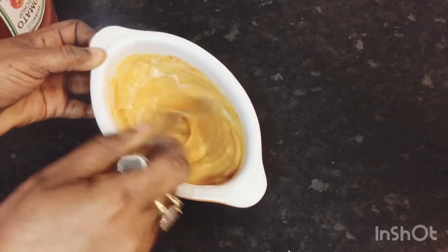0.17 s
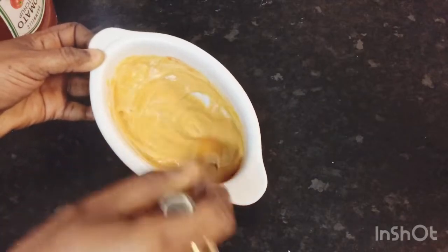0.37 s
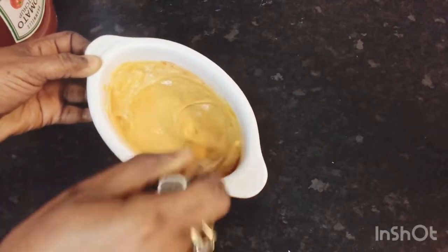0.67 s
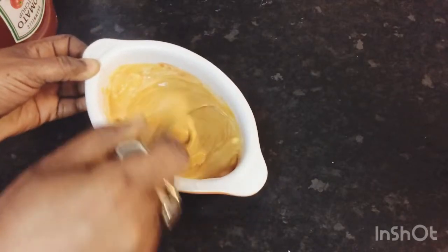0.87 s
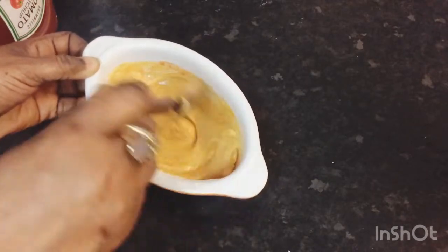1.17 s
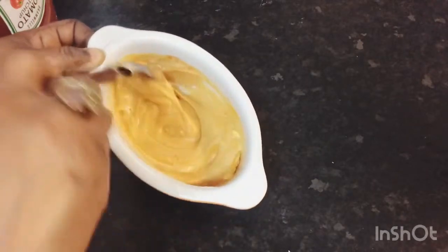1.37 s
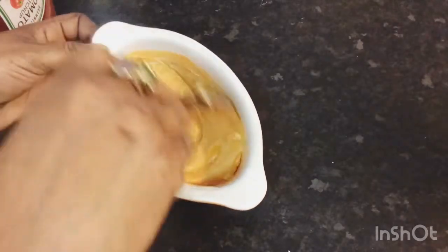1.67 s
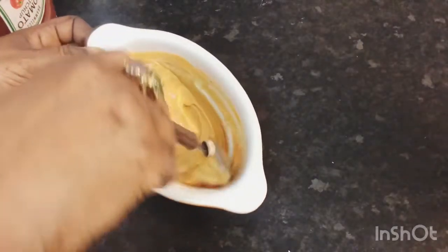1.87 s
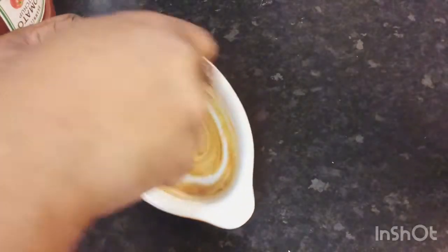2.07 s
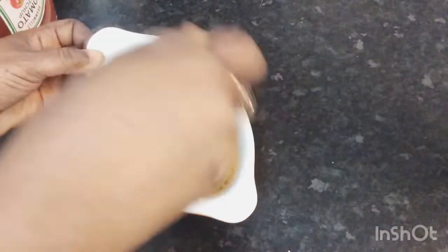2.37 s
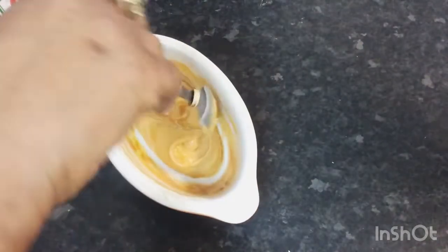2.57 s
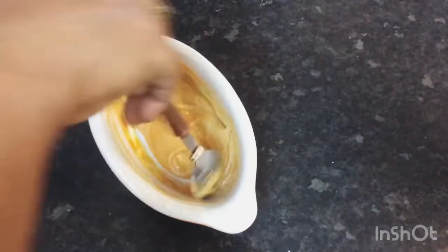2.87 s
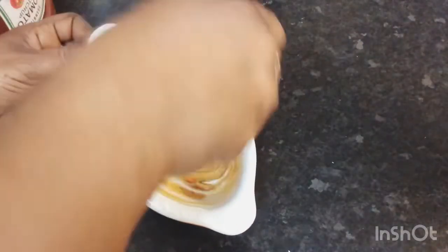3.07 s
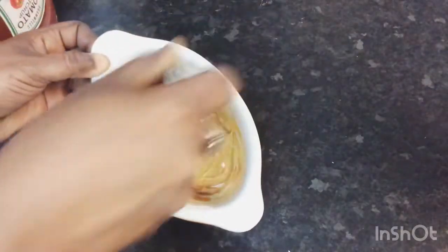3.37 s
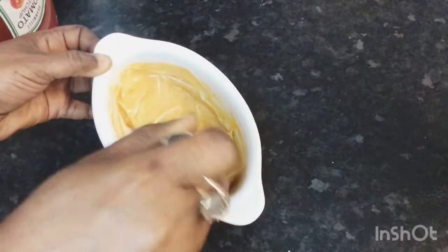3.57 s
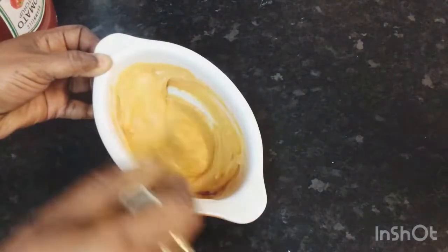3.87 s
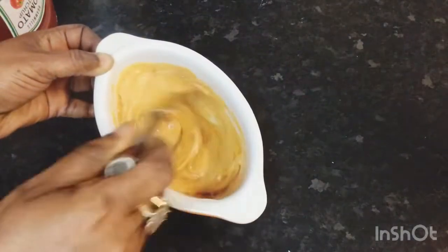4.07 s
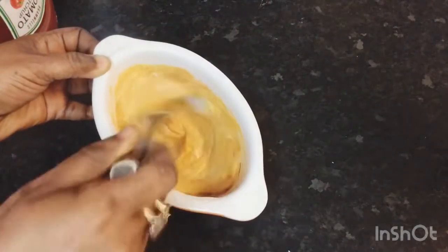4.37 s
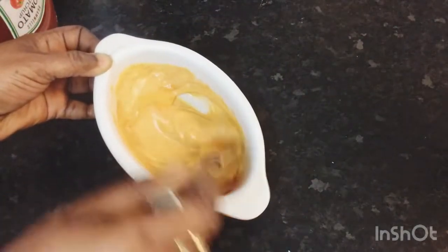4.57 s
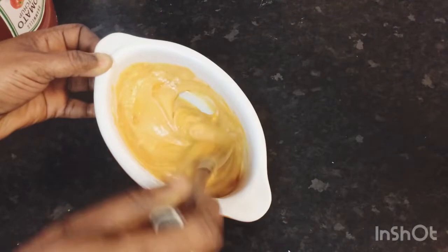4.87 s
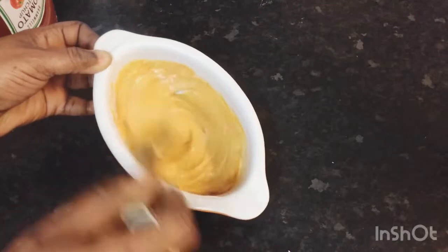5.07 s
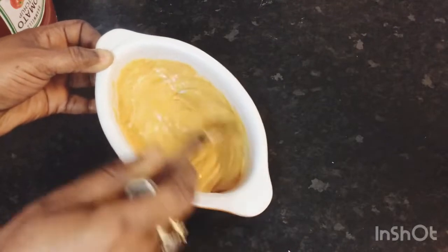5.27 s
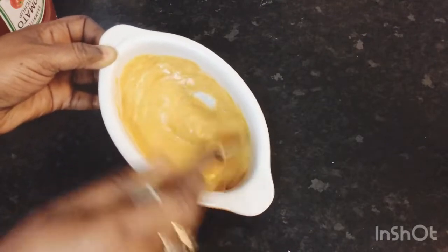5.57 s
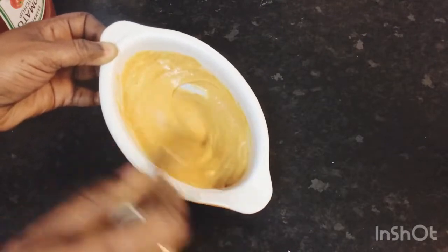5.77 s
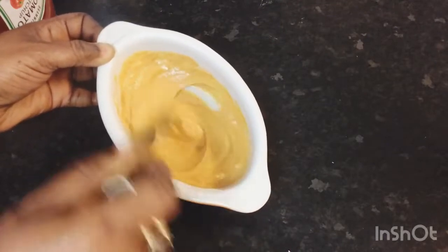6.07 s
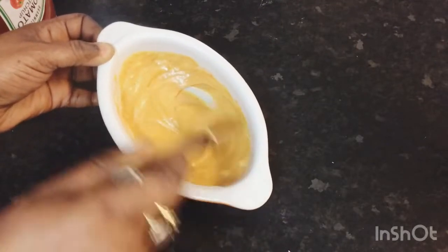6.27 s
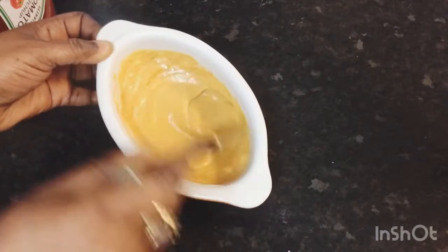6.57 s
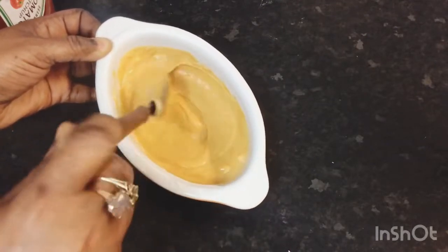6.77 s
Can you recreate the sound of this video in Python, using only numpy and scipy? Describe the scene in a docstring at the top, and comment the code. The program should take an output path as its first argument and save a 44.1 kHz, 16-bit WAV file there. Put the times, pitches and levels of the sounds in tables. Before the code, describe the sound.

Thick sauce is churned with sticky squelching while a metal spoon knocks dully, then clinks sharply and rapidly against a small ceramic bowl in a kitchen.

```python
"""A metal spoon stirs thick sauce in a small ceramic dish held on a kitchen worktop.
Its clinks and knocks are struck modes plus a noise snap, quickly damped by the sauce and the hand.
Wipes and air pockets squelch as gliding resonant noise; dense tiny clicks make the churn, rub and drag.
A small hard room answers with decaying noise, over a faint steady hiss."""
import sys
import numpy as np
from scipy import signal
from scipy.fft import rfft, irfft
from scipy.io import wavfile
from scipy.ndimage import uniform_filter1d, minimum_filter1d

SR = 44100
rng = np.random.default_rng(int(sys.argv[2]) if len(sys.argv) > 2 else 0)


def digitize_waveform(pressure):
    """Quantize a signal to 16-bit integers and store it at the path in sys.argv[1].

    Rows of a 2-D input are taken as channels; values are limited to [-1, 1].
    """
    field = np.atleast_2d(pressure).T
    bounded = np.clip(field, -1, 1)
    quanta = np.round(bounded * 32767).astype(np.int16)
    wavfile.write(sys.argv[1], SR, quanta)


N = 304290  # length in samples

# blows of the spoon's edge on bare glaze: t/s, dish ring level/dB, brightness/dB (lifts the dish's
# middle modes and lowers the rest), snap level/dB, spoon clack level/dB, spoon tink level/dB,
# worktop thud level/dB, rebound share/0-1
CLINKS = [(0.162, -36, 1, -21.5, -34, -34, -46, 0.32), (0.781, -29, 8, -18, -39, -19, -32, 0.34),
          (1.116, -27, 9, -16, -50, -49, -42, 0.26), (2.834, -33, 6.5, -12, -58, -32, -38.5, 0.34),
          (2.854, -36, -6.5, -20.5, -30.5, -50, -34.5, 0.43), (3.631, -17.5, 0, -12, -32, -16.5, -30, 0.33),
          (3.839, -17.5, 3.5, -17, -42, -22.5, -57, 0.54), (4.152, -13, 6, -9.5, -33, -16.5, -55, 0.39),
          (4.314, -17.5, 5.5, -10.5, -40, -31, -40.5, 0.22), (4.453, -26, -5.5, -14, -27, -30, -73, 0.16),
          (4.608, -17, 5, -8.5, -38, -27, -38, 0), (4.950, -21.5, 11.5, -16, -41, -18, -39, 0.18),
          (5.082, -16, 1, -12, -20.5, -17, -56, 0.14), (5.276, -21.5, 8.5, -13, -31.5, -24.5, -38, 0.04),
          (5.417, -15, -1, -7.5, -22.5, -14, -60, 0.29), (5.611, -25, 7, -16.5, -45, -25.5, -42.5, 0.16),
          (5.764, -14.5, 6, -9, -43, -21, -47, 0.2), (5.974, -26, 5, -24, -47, -20.5, -54, 0.23),
          (6.117, -26, 2, -19.5, -34.5, -31.5, -50, 0.2), (6.293, -36.5, 2, -24.5, -51, -46, -46, 0.6),
          (6.604, -28.5, 3.5, -29, -33.5, -34, -43, .1)]
# dull knocks of the spoon's back through the sauce: t/s, strength level/dB, worktop thud level/dB
KNOCKS = [(0.073, -29, -50), (0.399, -19, -38.5), (0.677, -31, -56.5), (1.025, -23, -40.5),
          (1.433, -35.5, -63), (1.527, -41, -69), (2.71, -24, -41.5), (3.516, -32, -42),
          (3.944, -23.5, -43), (4.260, -28.5, -51), (4.559, -24.5, -45), (4.838, -35.5, -76),
          (5.012, -33.5, -53), (5.512, -31, -66), (6.166, -35, -62), (6.212, -28, -49),
          (6.554, -15.5, -37.5)]
# hard pushes that rock the dish on the worktop: t/s, level/dB
BUMPS = [(2.852, -34.5), (6.553, -41.5)]
# modes of the ceramic dish, many in close pairs: f/Hz, level/dB, t60/s before the damping factor
DISH_MODES = [(1975, -6, 0.13), (2059, 2.5, 0.062), (2208, 1, 0.015), (4641, -7, 0.073), (4878, -1, 0.05),
              (4840, -1, 0.033), (5610, -1.5, 0.0088), (6880, -4, 0.016), (7814, -6.5, 0.097),
              (8120, 3.5, 0.045), (8100, -23.5, 0.05), (9250, -2, 0.031), (11800, -21, 0.027),
              (11500, -20, 0.21), (12270, -10.5, 0.044), (14540, -10, .02)]
# modes of the metal spoon: f/Hz, level/dB, t60/s before the damping factor
SPOON_MODES = [(1090, -13, 0.051), (1280, 8, 0.0074), (1498, -1, 0.031), (1713, 5.5, 0.018),
               (2440, -10, 0.0018), (2390, 8, 0.0085), (2760, -21.5, 0.0031), (3120, -14.5, 0.02),
               (3530, -12.5, 0.022), (3880, 7, 0.0073), (3840, 3.5, 0.009), (4450, -20.5, 0.024)]
# modes of the worktop: f/Hz, level/dB, t60/s
WORKTOP_MODES = [(120, -8, 0.19), (215, -21.5, 0.016), (266, -5, 0.091), (334.5, -0.5, 0.057),
                 (374.3, 1, 0.067), (408, -4, 0.17), (494.4, -2, 0.11), (520, -3.5, 0.027)]
# wipes that push sauce along the wall: t/s, length/s, squelch f/Hz, width/Hz,
# squelch level/dB, rubbing on the glaze level/dB
WIPES = [(0.17, 0.056, 4050, 600, -45, -60), (0.43, 0.17, 1694, 686, -64, -51),
         (1.3, .032, 1400, 500, -55, -74), (1.357, 0.065, 1816, 1100, -49.5, -76),
         (1.611, .21, 1911, 1000, -48.5, -51.5), (1.929, 0.047, 2040, 513, -42, -58),
         (1.936, .046, 4560, 200, -47, -61), (2.05, 0.064, 1858, 453, -45.5, -57),
         (2.11, 0.14, 1584, 463, -46, -49), (3.076, 0.091, 2001, 233, -42, -48),
         (3.132, 0.088, 1187, 348, -50, -58), (3.19, .11, 1560, 590, -47.5, -58),
         (3.408, 0.096, 2246, 876, -50.5, -46), (4.047, 0.064, 3980, 500, -42.5, -47),
         (4.756, 0.043, 4000, 500, -51, -62), (5.649, 0.074, 3390, 900, -46, -60),
         (6.003, 0.048, 2005, 450, -42.5, -56), (6.31, .056, 3810, 900, -50, -46.5),
         (6.631, .09, 2700, 1330, -47, -46.5)]
# air pockets that open behind the spoon: t/s, length/s, level/dB
POCKETS = [(1.157, .05, -48), (4.335, .05, -47), (4.637, .058, -42.5), (5.324, .044, -44), (5.44, .04, -66),
           (5.692, .045, -45)]
# how hard the spoon stirs, before the trims: t/s, sauce churn level/dB, drag on the worktop level/dB
STIR = [(0.0, -55.5, -73), (0.4, -53.5, -73), (1.06, -59.5, -62), (1.23, -54, -77), (1.52, -61, -67.5),
        (2.08, -48.5, -47.5), (2.32, -57.5, -61), (2.71, -78, -75), (3.0, -54.5, -55), (3.44, -57, -63),
        (3.75, -46.5, -69), (4.57, -50.5, -66), (4.82, -50, -61.5), (5.25, -50, -59), (5.63, -47.5, -61),
        (6.21, -53, -70), (6.4, -53, -72), (6.9, -60, -57)]
# tone of the tearing sauce: f/Hz, level/dB
CHURN_TONE = [(600, -14.5), (1000, -5), (1250, 6.5), (1550, 6.5), (2000, -2), (2400, -7.5), (3200, -36),
              (5000, -38)]
# tone of metal on glaze: f/Hz, level/dB
RUB_TONE = [(2000, -32), (3200, 8), (4000, 2), (4800, -3), (5800, 1), (7000, -10), (8200, 0.5),
            (11000, -7.5), (15000, -23)]
# tone of the dish dragging on the worktop: f/Hz, level/dB
DRAG_TONE = [(90, -31), (180, 4), (400, -3), (550, 2.5), (800, -9), (1200, -16)]
# decay time of the room: f/Hz, t60/s
ROOM_T60 = [(100, 0.18), (500, 0.34), (2000, 0.34), (5000, 0.38), (9000, 0.39), (16000, 0.27)]
# tone of the background hiss: f/Hz, level/dB
HISS_TONE = [(25, -8), (38, -14), (55, 8.5), (80, -4), (103, 5.5), (135, -7.5), (270, -6.5), (600, -7),
             (1100, -6), (2100, -8), (3700, 0), (9300, 2.5), (12000, -4.5), (16000, -18)]

CLINK_LENGTH, KNOCK_LENGTH = 0.82, 0.25  # factors on the modes' decay times
CLINK_TOP_DB, CLINK_HIGHEST_DB = -3.5, -6  # dish modes near 8 kHz and above 11 kHz, against the lowest
KNOCK_DISH_DB, KNOCK_SNAP_DB = -15.5, -2  # against the knock's strength
KNOCK_TINK_DB = -19  # the spoon's upper modes, against the knock's strength
KNOCK_REBOUND = 0.17  # share of the blow kept at each new touch
SAUCE_LOAD = 0.045  # spread of the share by which clinging sauce and grip shift the spoon's modes
FILM_S = 0.00032  # the film of sauce softens the first instant of each blow
RIM_LENGTH, RIM_DB, RIM_TOP_DB = 8.4, -28, -14  # bare rim: decay factor, level, its highest modes' trim
BUMP_DECAY_S, BUMP_LOW_HZ, BUMP_HIGH_HZ = 0.014, 148, 400
WIPE_JERKS_PER_S, WIPE_JERK_DB = 170, 0.5
WIPE_RING_DB, SQUELCH_RING_DB = 2.5, -11.5  # how strongly rubbing and squelching set the dish singing
SLIDE_LAG_S, SLIDE_S, SLIDE_DB = 0.022, 0.078, -56  # swish along the glaze after every clink
SLIDE_HZ, SLIDE_WIDTH_HZ = 3840, 1400
POCKET_START_HZ, POCKET_END_HZ, POCKET_WIDTH_HZ = 2000, 1133, 240
CHURN_DB, RUB_DB, DRAG_DB = -5, -8, -5.5  # trims on the stirring levels; rubbing follows the churn
HISS_DB = -49.5
CUTOFF_HZ = 16000


def taps():
    """Bright clinks and dull knocks ring dish and spoon, with worktop thuds under both."""
    rings, thuds = np.zeros(N), np.zeros(N)
    dish_hz = np.array(DISH_MODES)[:, :1]
    for s, db, bright_db, snap_db, clack_db, tink_db, thud_db, share in CLINKS:
        low, middle = db - bright_db, db + bright_db
        top, highest = low + CLINK_TOP_DB, low + CLINK_HIGHEST_DB
        balance = [(2150, low), (4600, middle), (4900, middle), (7000, top), (9300, top), (11000, highest)]
        dish_db = at_hz(balance, dish_hz)
        spoon_db = spoon_drive(clack_db, tink_db)
        add(rings, s, contact(dish_db, spoon_db, snap_db, CLINK_LENGTH, share))
        add(thuds, s, thud(thud_db))
    for s, db, thud_db in KNOCKS:
        dish_db = db + KNOCK_DISH_DB
        spoon_db = spoon_drive(db, db + KNOCK_TINK_DB)
        add(rings, s, contact(dish_db, spoon_db, db + KNOCK_SNAP_DB, KNOCK_LENGTH, KNOCK_REBOUND))
        add(thuds, s, thud(thud_db))
    # small bodies radiate little below their lowest modes
    rings = band_pass(rings, 1153, 23000, order=5)
    thuds = band_pass(thuds, 111, 770, order=2)
    return rings, thuds + bumps()


def contact(dish_db, spoon_db, snap_db, length, share):
    """One blow excites the dish, the spoon and a snap, and again on each rebound."""
    out = np.zeros(SR)
    for lag, gain in rebound(share, gap_s=0.0048):
        dish = from_db(1.5) * struck(DISH_MODES, dish_db, length, scatter_db=3.0, detune=0.0063)
        spoon = from_db(3.0) * struck(SPOON_MODES, spoon_db, length, scatter_db=2.5, detune=SAUCE_LOAD)
        snap = from_db(snap_db) * crack(decay_s=0.0024, low_hz=1900, high_hz=8350)
        for part in (dish, spoon, snap):
            add(out, lag, gain * part)
    # the bare rim, above the sauce, sings on faintly
    rim_db = dish_db + at_hz([(8000, 0), (11000, RIM_TOP_DB)], np.array(DISH_MODES)[:, :1])
    rim = struck(DISH_MODES, rim_db, RIM_LENGTH, scatter_db=-2.5, detune=0.00055)
    add(out, 0, from_db(RIM_DB) * rim)
    softened_onset = 1 - np.exp(-np.arange(SR) / (FILM_S * SR))
    return out * softened_onset


def spoon_drive(clack_db, tink_db):
    """The spoon's low modes clack and its high modes tink: dB for each mode."""
    return at_hz([(1750, clack_db), (2800, tink_db)], np.array(SPOON_MODES)[:, :1])


def rebound(share, gap_s):
    """Up to three touches, milliseconds apart, each weaker by the share: rows (lag s, gain)."""
    lags = np.cumsum([0, *rng.uniform(0.61, 1.6, 2)]) * gap_s
    gains = np.clip(share, 0, .9) ** np.arange(3)
    return zip(lags, gains)


def crack(decay_s, low_hz, high_hz):
    """The broad snap of metal meeting glaze: a dying burst of band-limited noise."""
    t = np.arange(SR // 8) / SR
    noise = band_pass(rng.standard_normal(len(t)), low_hz, high_hz, order=2)
    return noise * np.exp(-t / decay_s)


def thud(db):
    """A blow passes through the dish's foot and rings the worktop's modes."""
    return from_db(-6.5) * struck(WORKTOP_MODES, db, 1, scatter_db=2.3, detune=0.012)


def bumps():
    """The dish drops back on its foot with a short low thump of noise."""
    out, t = np.zeros(N), np.arange(SR // 4) / SR
    for s, db in BUMPS:
        rumble = rms_one(band_pass(rng.standard_normal(len(t)), BUMP_LOW_HZ, BUMP_HIGH_HZ, order=2))
        add(out, s, from_db(db) * rumble * np.exp(-t / BUMP_DECAY_S))
    return out


def wipes():
    """The spoon pushes sauce along the wall in uneven jerks, which set the dish singing."""
    squelch, pressure = np.zeros(N), np.zeros(N)
    for s, length, hz, width_hz, db, rub_db in WIPES:
        add(squelch, s, from_db(db) * stroke(length, hz, hz, width_hz))
        add(pressure, s, from_db(rub_db) * swell(length))
    jerks = from_db(WIPE_JERK_DB * drift(WIPE_JERKS_PER_S))
    squelch = squelch * jerks
    rub = rubbing() * pressure * jerks
    modes = struck(DISH_MODES, 0, 1, scatter_db=0, detune=0)
    modes = modes / np.linalg.norm(modes)
    rub_force = from_db(WIPE_RING_DB) * band_pass(rub, 1800, 5400, order=2)
    force = from_db(SQUELCH_RING_DB) * squelch + rub_force
    ring = signal.fftconvolve(force, modes)[:N]
    return squelch + rub + ring


def squelches():
    """Wet strokes: a slide after each clink, and air pockets that fall in pitch as they grow."""
    out = np.zeros(N)
    for s, *_ in CLINKS:
        slide = stroke(SLIDE_S, SLIDE_HZ, SLIDE_HZ, SLIDE_WIDTH_HZ)
        add(out, s + SLIDE_LAG_S, from_db(SLIDE_DB) * slide)
    for s, length, db in POCKETS:
        pocket = stroke(length, POCKET_START_HZ, POCKET_END_HZ, POCKET_WIDTH_HZ)
        add(out, s, from_db(db) * pocket)
    # thick sauce sticks and lets go in quick jerks
    return out * from_db(1.4 * drift(per_s=240))


def stroke(length_s, start_hz, end_hz, width_hz):
    """A noisy resonance that can glide as the gap behind the spoon changes size."""
    envelope = swell(length_s)
    count = len(envelope)
    low_pass = signal.butter(2, width_hz / 2, fs=SR, output="sos")
    # slow noise on a carrier becomes a narrow band around it
    flutter = signal.sosfilt(low_pass, rng.standard_normal((2, SR // 2)))[:, -count:]
    phase = 2 * np.pi * np.cumsum(np.geomspace(start_hz, end_hz, count)) / SR
    return envelope * rms_one(flutter[0] * np.cos(phase) + flutter[1] * np.sin(phase))


def swell(length_s):
    """A stroke's envelope: rise, hold, fall."""
    return signal.windows.tukey(int(np.clip(length_s * SR, 64, SR // 2)), .5)


def stirring():
    """Sticky sauce tears in small crackles, the spoon rubs the glaze, the dish drags a little."""
    s, *columns = np.transpose(STIR)
    churn_db, drag_db = [np.interp(np.arange(N) / SR, s, c) for c in columns]
    churn = coloured(grains(per_s=1200, spread_db=-1.0), CHURN_TONE) * from_db(2.8 * drift(per_s=110))
    drag = coloured(grains(per_s=5000, spread_db=1.5), DRAG_TONE)
    rub = rubbing()
    sauce = from_db(churn_db + CHURN_DB) * (churn + 1.76 * dish_ring(churn, length=0.23))
    glaze = from_db(churn_db + RUB_DB) * (rub + 1.36 * dish_ring(rub, length=1.0))
    return sauce + glaze + from_db(drag_db + DRAG_DB) * drag


def rubbing():
    """Metal slips over the glaze in dense tiny clicks."""
    return coloured(grains(per_s=4000, spread_db=4.0), RUB_TONE) * from_db(2.0 * drift(per_s=160))


def dish_ring(force, length):
    """The dish sings under a continuous force, coming and going with the pressure; rms 1."""
    modes = struck(DISH_MODES, 0, length, scatter_db=0, detune=0)
    pressure = from_db(6.2 * drift(per_s=21))
    return rms_one(signal.fftconvolve(force * pressure, modes)[:N])


def kitchen(x, build_s):
    """Dense reflections swell after the first arrival and die at a rate set for each band."""
    t = np.arange(SR * 3 // 4) / SR
    hz = np.fft.rfftfreq(len(t), 1 / SR)
    white = rfft(rng.standard_normal(len(t)))
    edges = np.geomspace(40, 20480, 10)
    tail = 0
    for low, high in zip(edges, edges[1:]):
        band = irfft(white * ((hz >= low) & (hz < high)), len(t))
        t60 = at_hz(ROOM_T60, np.sqrt(low * high))
        tail = tail + band * np.exp(-np.log(1000) * t / t60)
    tail = tail * (1 - np.exp(-t / build_s))
    return signal.fftconvolve(x, tail / np.linalg.norm(tail))[:N]


def steady_hiss():
    """Faint unchanging noise with a fixed tone."""
    return from_db(HISS_DB) * coloured(rng.standard_normal(N), HISS_TONE)


def struck(modes, drive_db, length, scatter_db, detune):
    """Decaying sines, each with a strength and pitch that can vary from blow to blow."""
    hz, db, t60 = np.transpose(modes)[:, :, None]
    t60 = t60 * np.clip(length, .2, 8)
    t = np.arange(0, t60.max(), 1 / SR)
    strength, shift = rng.standard_normal((2, len(modes), 1))
    sign = rng.choice([-1, 1], (len(modes), 1))
    level = sign * from_db(db + drive_db + scatter_db * strength)
    decay = np.exp(-np.log(1000) * t / t60)
    tones = np.sin(2 * np.pi * hz * (1 + detune * shift) * t)
    return np.sum(level * decay * tones, axis=0)


def grains(per_s, spread_db):
    """Tiny clicks at random times, of uneven size and random sign."""
    size_db = spread_db * np.minimum(rng.exponential(1, N), 4)
    sizes = from_db(size_db) * rng.choice([-1, 1], N)
    return sizes * (rng.random(N) < per_s / SR)


def drift(per_s):
    """Random wander: straight lines between normal draws of spread 1, per_s draws a second."""
    return np.interp(np.arange(N) / SR * per_s, np.arange(N), rng.standard_normal(N))


def coloured(x, spectrum):
    """Give a signal a smooth spectrum; rms 1."""
    gain = from_db(at_hz(spectrum, np.fft.rfftfreq(N, 1 / SR)))
    return rms_one(irfft(rfft(x) * gain, N))


def band_pass(x, low_hz, high_hz, order):
    """Causal band filter, its upper edge held below 0.45 of the sample rate."""
    band = [low_hz, min(high_hz, .45 * SR)]
    return signal.sosfilt(signal.butter(order, band, "band", fs=SR, output="sos"), x)


def at_hz(points, hz):
    """Read a table along log frequency."""
    known, values = np.transpose(points)
    return np.interp(np.log(np.maximum(hz, 1)), np.log(known), values)


def from_db(db):
    """Decibels to gain."""
    return 10 ** (np.asarray(db) / 20)


def rms_one(x):
    """Scale to unit rms."""
    return x / np.sqrt(np.mean(x ** 2) + 1e-20)


def add(out, s, sound):
    """Mix a sound in at time s."""
    start = max(round(s * SR), 0)
    out[start:start + len(sound)] += sound[:max(len(out) - start, 0)]


def scene():
    """Spoon, dish and sauce, their room reflections, and a steady hiss."""
    rings, thuds = taps()
    near = rings + stirring() + wipes() + squelches()
    sent = from_db(-11.0) * near + from_db(-4.5) * thuds
    # the circling arm, 1.1 turns a second, keeps changing the paths that the reflections take
    turn = 2 * np.pi * 1.1 * np.arange(N) / SR
    room = sum(kitchen(sent * share, build_s=0.0075) for share in (np.cos(turn), np.sin(turn)))
    return (near + thuds + room + steady_hiss())[None]


def record(dry):
    """A quick limiter holds down the sharpest peaks, and the top is cut."""
    needed = np.minimum(1, .88 / (np.abs(dry) + 1e-9))
    # hold each dip over 129 samples (3 ms), then smooth it
    gain = uniform_filter1d(minimum_filter1d(needed, size=129), size=129)
    top_cut = signal.ellip(10, .1, 70, CUTOFF_HZ, fs=SR, output="sos")
    return signal.sosfilt(top_cut, dry * gain)


dry = scene()
out = record(dry)
digitize_waveform(out)
```